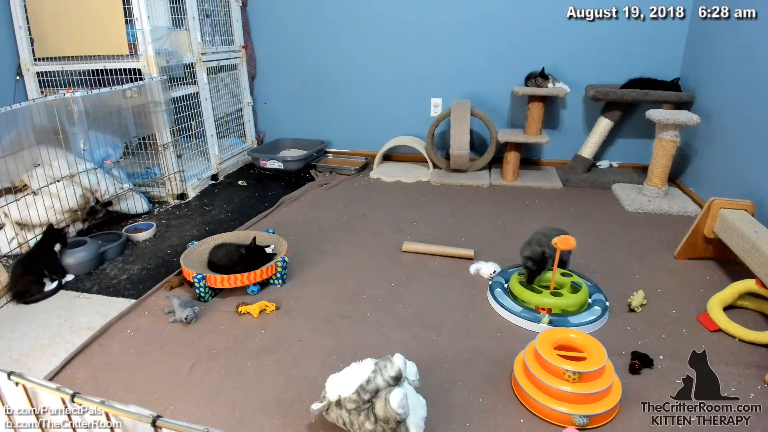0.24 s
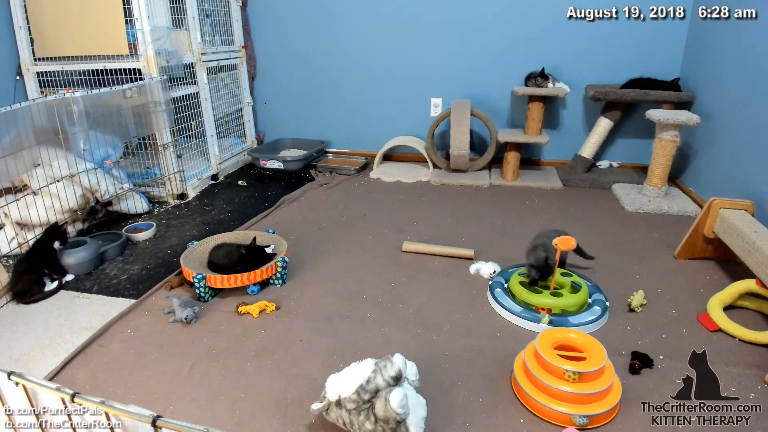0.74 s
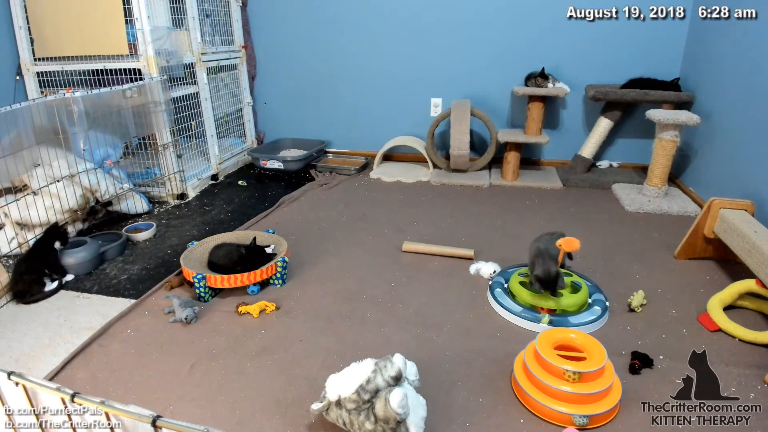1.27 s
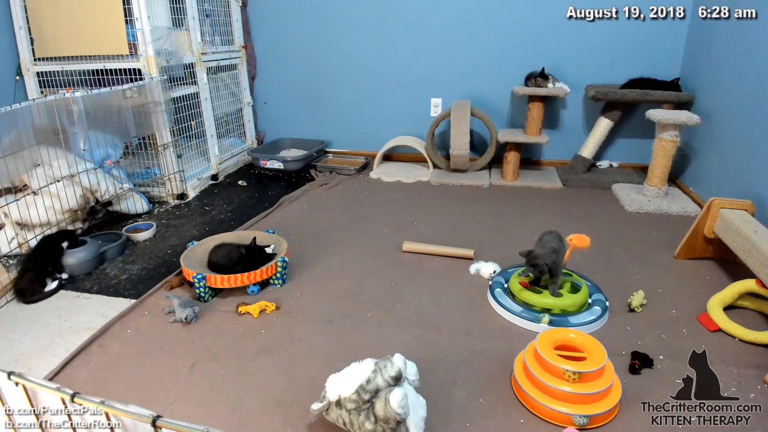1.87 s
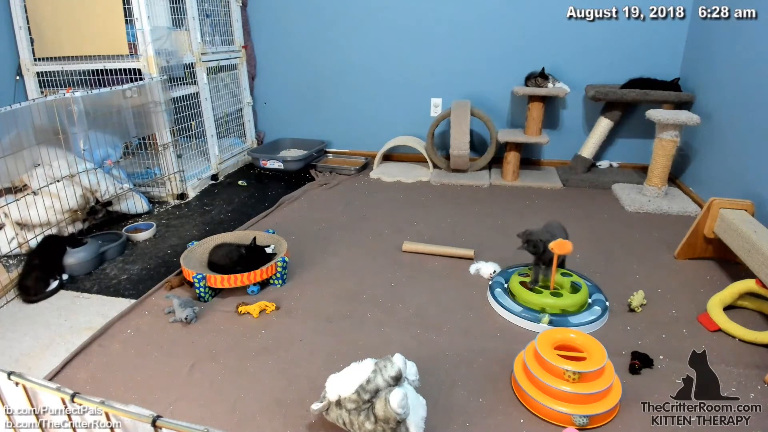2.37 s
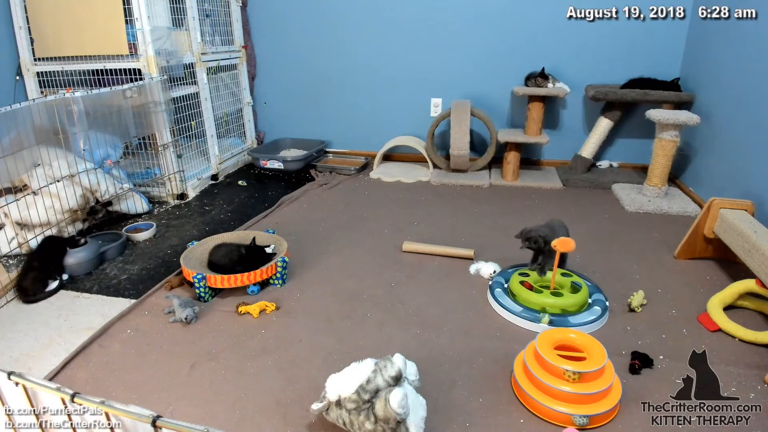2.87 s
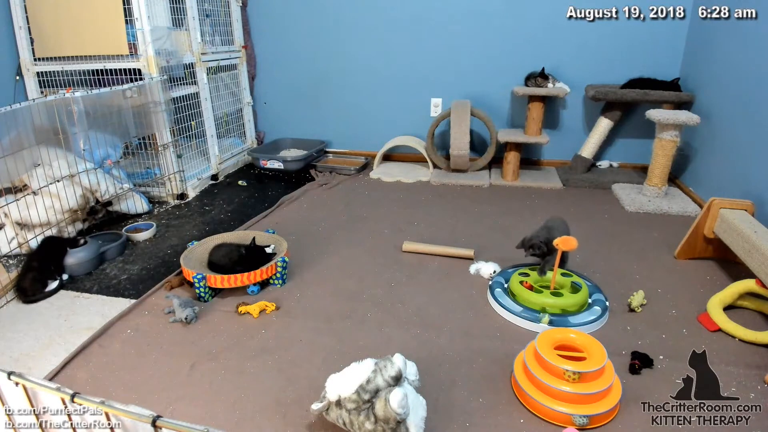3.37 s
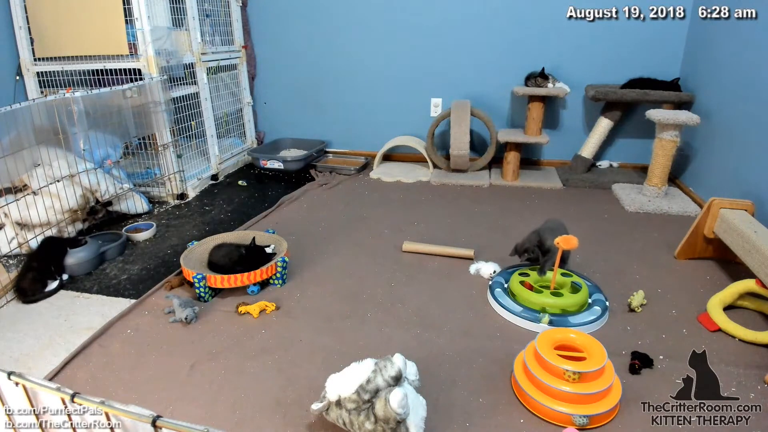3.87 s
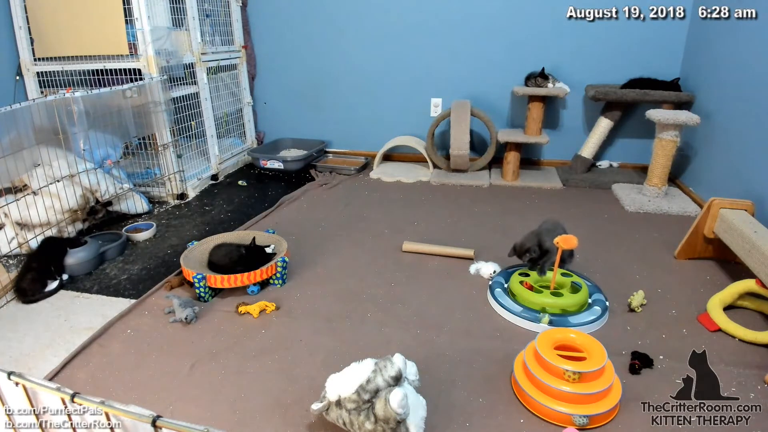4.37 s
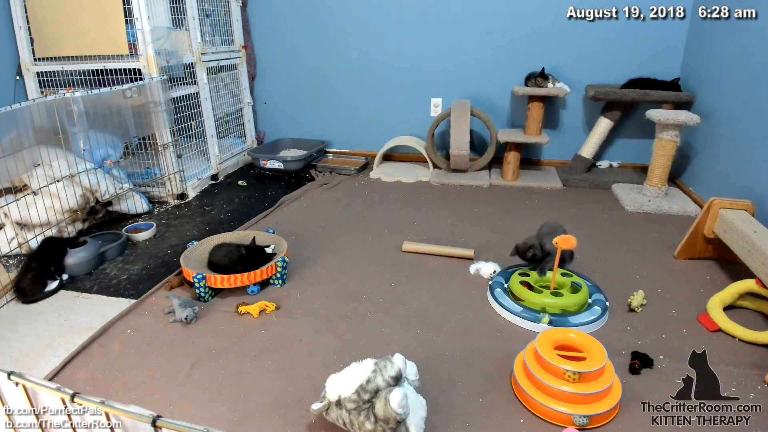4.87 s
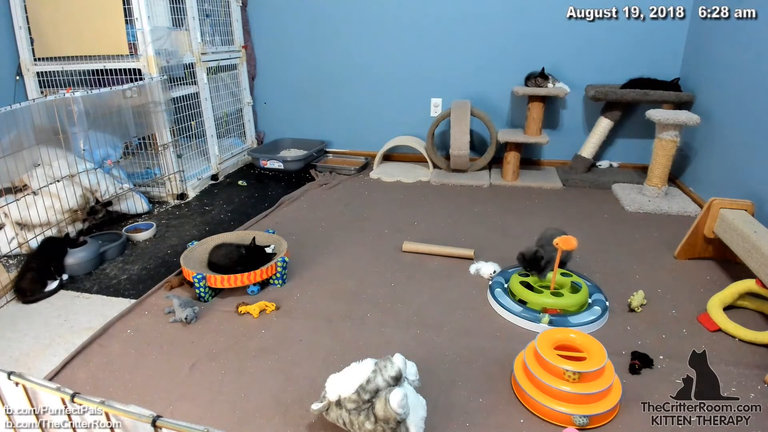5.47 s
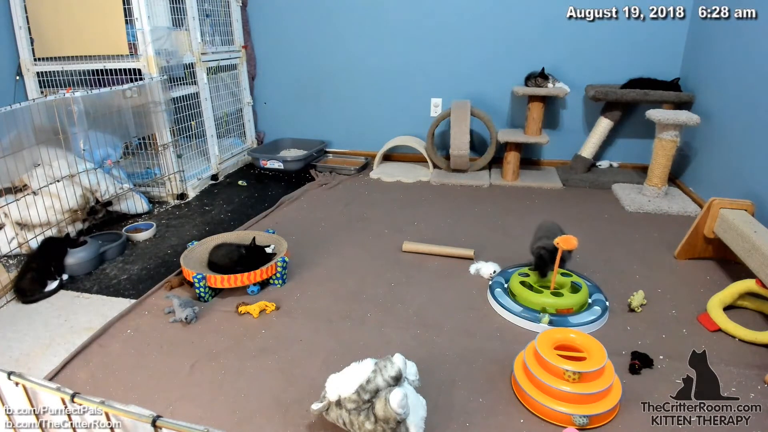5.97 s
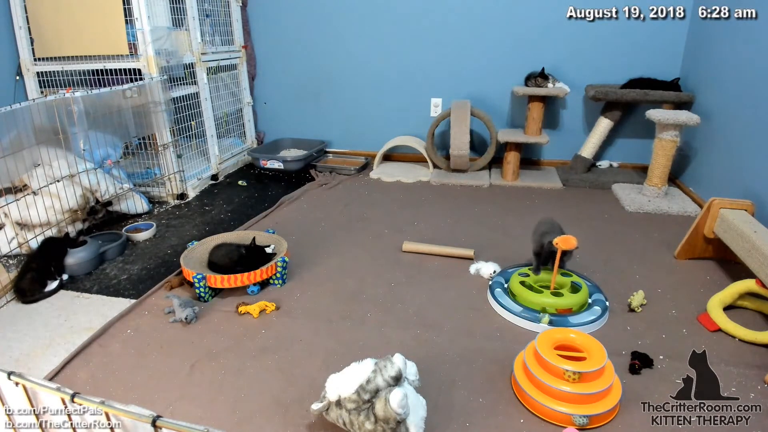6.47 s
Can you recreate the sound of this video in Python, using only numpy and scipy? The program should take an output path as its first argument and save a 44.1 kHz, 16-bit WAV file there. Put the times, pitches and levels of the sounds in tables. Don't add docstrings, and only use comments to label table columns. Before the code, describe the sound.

Hard, dry plastic clatter from a cat's ball track on carpet, heard from a few metres off in a small live room. Faint hiss and low air come first, then a dense flurry of pellet rattles, high clacks and ringing shell pings over hollow track knocks. It fades to single clicks, falls quiet, then resumes with a strong hollow knock, lively rolling rattle and sparser taps at the end.

```python
import sys
import numpy as np
from scipy import signal
from scipy.fft import rfft, irfft
from scipy.io import wavfile
from scipy.ndimage import uniform_filter1d

SR = 44100
rng = np.random.default_rng(int(sys.argv[2]) if len(sys.argv) > 2 else 0)


def output_pcm(signal):
    pcm = np.clip(np.atleast_2d(signal).T, -1, 1) * 32767
    wavfile.write(sys.argv[1], SR, np.round(pcm).astype(np.int16))


def natural_amplitude(level_db):
    exponent = np.asarray(level_db, float) / 20
    return 10 ** exponent


N = 296518

# (frequency [Hz], level [dB], t60 [s])
SHELL_MODES = [(3040, 6, 0.033), (3200, -18, 0.027), (3357, 5.5, 0.014), (3260, -0.5, 0.02),
               (3520, -7.5, 0.014), (3730, -6, 0.031), (3794, 6, 0.016), (4000, -3, 0.014),
               (4190, -6.5, 0.082), (4320, 10, 0.013), (4430, 2, 0.039), (4690, 2.5, 0.019)]
# (frequency [Hz], level [dB], t60 [s])
BELL_MODES = [(7355, 0, 0.017), (6720, -25, 0.026), (8487, -4.5, 0.022), (8560, -3, 0.015),
              (9815, -12, 0.03), (9780, -6.5, 0.025), (12500, -10, 0.0055), (13200, -10.5, .004),
              (13700, -10, .006), (14100, -12, .004), (15000, -13, .006)]
# (frequency [Hz], level [dB], t60 [s])
TRACK_MODES = [(489.4, -5.5, 0.071), (588, -10, 0.072), (671, -3, 0.049), (784.5, 1, 0.047),
               (884, 1.5, 0.031), (982, -9.5, 0.04), (1023, 0, 0.04), (1109, 1.5, 0.051),
               (1256, -7, 0.0346)]
# (frequency [Hz], level [dB], t60 [s])
RIM_MODES = [(1360, 0.5, 0.022), (1530, -2.5, 0.033), (1670, -4, 0.03), (1844, -1, 0.02), (2016, -2, 0.022),
             (2174, -7, 0.041), (2330, -10.5, 0.05)]


def rms_one(x):
    return x / np.sqrt(np.mean(x ** 2) + 1e-20)


def filtered(x, order, hz, kind):
    return signal.sosfilt(signal.butter(order, hz, kind, fs=SR, output="sos"), x)


def ring(clicks, hz, t60_s):
    r = natural_amplitude(-60 / (t60_s * SR))
    w = 2 * np.pi * hz / SR
    return signal.lfilter([0, np.sin(w)], [1, -2 * r * np.cos(w), r * r], clicks + 1e-18)


def train(times_s, db):
    clicks = np.zeros(N)
    clicks[np.round(times_s * SR).astype(int)] = natural_amplitude(db)
    return clicks


def held(times_s, values):
    latest = np.searchsorted(np.round(times_s * SR), np.arange(N), "right") - 1
    return values[np.clip(latest, 0, None)]


def grains(per_s, spread_db):
    sizes = natural_amplitude(spread_db * np.minimum(rng.exponential(1, N), 2.6))
    sizes *= rng.choice([-1, 1], N)
    return rms_one(sizes * (rng.random(N) < per_s / SR))


def bursts(rows, rise_db_per_s, sag_db_per_s, stop_db_per_s):
    hop = 32
    start_s, length_s, db, *rest = np.transpose(rows)
    since = np.arange(0, N, hop) / SR - start_s[:, None]
    rolled = np.clip(since, 0, length_s[:, None])
    levels = db[:, None] - rise_db_per_s * np.maximum(-since, 0)
    levels = levels - sag_db_per_s * rolled - stop_db_per_s * np.maximum(since - rolled, 0)
    lead = levels.argmax(axis=0)
    steps = np.arange(since.shape[1])
    columns = [levels[lead, steps], rolled[lead, steps]] + [c[lead] for c in rest]
    return [np.repeat(c, hop)[:N] for c in columns]


def strike(modes, clicks, favour_hz=None, db_per_octave=0, scatter_db=0, turning_db=0):
    turns_per_s = 3.3
    at = np.flatnonzero(clicks)
    luck = rng.standard_normal((len(at), len(modes)))
    out = np.zeros(N)
    for k, (hz, level_db, t60_s) in enumerate(modes):
        octaves_off = 0 if favour_hz is None else np.abs(np.log2(hz / favour_hz[at]))
        aim = np.sin(2 * np.pi * turns_per_s * at / SR * (1 + k / len(modes)) + k * k)
        push_db = level_db - db_per_octave * octaves_off + scatter_db * luck[:, k] + turning_db * aim
        push = np.zeros(N)
        push[at] = clicks[at] * natural_amplitude(push_db) * (-1) ** k
        out += ring(push, hz, t60_s)
    return out


def crack(clicks, low_hz, high_hz):
    return filtered(clicks, 2, [low_hz, high_hz], "band")


def grit(clicks, tilt_db):
    ribs = [(hz, tilt_db * np.log2(hz / 6000), 62.0 / hz) for hz in np.geomspace(5100, 11300, num=15)]
    return strike(ribs, clicks, scatter_db=6.0) + 0.3 * crack(clicks, 4800, 13000)


def slot(x):
    return filtered(x, 6, 2700.0, "high")


def air():
    air_db, hum_db, hum_hz, hum_t60_s = -57.5, -69, 43.7, 0.16
    # (frequency [Hz], density [dB per Hz])
    spectrum = [(38, -36), (65, -8.5), (92, -10.5), (174, -1), (282, -5.5), (407, -6.5), (588, -11),
                (723, -9), (792, -11.5), (974, -10), (2170, -17.5), (4040, -21.5), (15600, -29)]
    points = np.array(spectrum)
    hz = np.maximum(np.fft.rfftfreq(N, 1 / SR), 1)
    shape = natural_amplitude(np.interp(np.log(hz), np.log(points[:, 0]), points[:, 1]))
    hum = ring(ring(rng.standard_normal(N), hum_hz, hum_t60_s), hum_hz, hum_t60_s)
    hiss = irfft(rfft(rng.standard_normal(N)) * shape, N)
    return natural_amplitude(air_db) * rms_one(hiss) + natural_amplitude(hum_db) * rms_one(hum)


def knocks():
    # (time [s], peak level [dB], favoured track pitch [Hz], thud share [dB])
    blows = [(1.148, -39, 910, -18.5), (1.2, -32.5, 880, -36), (1.562, -25, 760, -22),
             (1.603, -28.5, 736, -12.5), (1.758, -36.5, 1120, -12), (1.837, -36, 1050, -29),
             (1.945, -29, 970, -26), (2.094, -35, 1050, -15.5), (2.224, -58, 1280, -9),
             (2.289, -37, 1203, -32), (2.407, -27.5, 970, -17), (2.65, -43, 1140, -15),
             (2.702, -31.5, 1250, -10.5), (2.829, -40.5, 1150, -9), (3.062, -18.5, 1070, -28),
             (4.204, -37, 1080, -15), (4.413, -30, 1350, -23), (4.448, -8, 980, -20),
             (4.554, -21.5, 1150, -28), (4.719, -23, 1290, -33), (4.921, -28, 755, -44),
             (4.995, -28, 756, -40), (5.125, -31, 700, -33), (5.247, -35, 870, -24),
             (5.498, -33, 1120, -38), (5.782, -48, 1080, -23), (5.98, -36, 804, -6),
             (5.994, -21, 960, -8.5), (6.481, -44, 1110, -31), (6.691, -45.5, 840, -37)]
    # (time [s], level [dB], frequency [Hz])
    stray_taps = [
        (0.017, -48, 7100),
        (3, -32.5, 2540),
        (2.567, -37, 2080),
        (2.581, -38, 2160),
        (4.805, -28, 6440),
        (1.798, -26.5, 2200),
        (4.448, -20.5, 2230),
    ]
    s, db, hz, thud_db = np.transpose(blows)
    body = strike(TRACK_MODES, train(s, db - 7.0), held(s, hz), db_per_octave=18.5, scatter_db=4.0)
    rim = strike(RIM_MODES, train(s, db - 21.5), scatter_db=6.5)
    thud = crack(train(s, db + thud_db + 36.5), 390, 620)
    taps = sum(ring(train(np.array([t]), tap_db), tap_hz, 0.019) for t, tap_db, tap_hz in stray_taps)
    return crack(body, 590, 3700) + rim + thud + taps


def chatter():
    # (start [s], length [s], level [dB], favoured shell pitch [Hz], brightness [dB])
    tumbles = [(1.125, .07, -47, 3520, -3), (1.192, 0.13, -24.5, 3780, 0.5),
               (1.31, 0.074, -20.5, 3570, 5.5), (1.44, 0.052, -17.5, 3200, -1),
               (1.54, 0.17, -26, 3640, 3), (1.787, 0.0096, -16.5, 3500, 3.5),
               (1.842, 0.013, -28.5, 4000, 8), (1.9, 0.13, -24.5, 3880, -6),
               (2.075, 0.017, -32, 3360, 9), (2.1, 0.13, -36.5, 3520, 3.5),
               (2.222, 0.048, -29.5, 3620, -2), (2.31, 0.095, -34, 3740, 5.5),
               (2.52, 0.12, -46.5, 3750, -10), (2.63, .03, -37.5, 3870, -11.5),
               (2.665, 0.014, -32.5, 4000, -9), (2.706, 0.026, -26.5, 4030, -6),
               (2.81, 0.049, -35.5, 4000, -1), (3.065, 0.016, -39, 3760, -1),
               (3.012, 0.0048, -29, 3800, 3), (3.258, 0.0099, -50, 4010, 6),
               (4.139, 0.026, -46.5, 4150, 8), (4.206, 0.015, -48, 3240, -8),
                      (4.383, .035, -32, 3960, -8.5), (4.43, 0.1, -21.5, 3430, 0),
                      (4.708, 0.046, -25.5, 3480, -4), (4.818, .015, -30, 3060, 5.5),
                      (4.849, 0.021, -20, 3320, 3), (4.958, 0.011, -24, 4400, 4),
                      (4.981, 0.084, -23, 3250, 4), (5.105, 0.23, -32, 3630, 2.5),
                      (5.238, 0.14, -27, 3630, 1), (5.499, 0.066, -32.5, 3280, -6.5),
                      (5.546, 0.097, -29.5, 3660, 0), (5.798, 0.01, -41, 3660, 2),
                      (5.914, 0.015, -37, 3730, 1.5), (6.246, 0.028, -32.5, 3300, -5),
                      (6.59, 0.025, -41.5, 3380, -22), (5.982, .025, -28.5, 3300, -0.5),
                      (6.01, 0.0096, -27, 3700, -0.5), (6.144, 0.032, -25, 3700, -4),
                      (6.468, 0.016, -33.5, 3400, -27), (6.67, 0.045, -39, 4000, -24)]
    shell_db, bell_db, grit_db = -5.5, -11.5, -17.5
    pitch_sag_hz_per_s = 1400
    level_db, rolled, start_hz, bright_db = bursts(
        tumbles, rise_db_per_s=2496, sag_db_per_s=11.5, stop_db_per_s=189.5)
    favour_hz = start_hz - pitch_sag_hz_per_s * rolled
    contacts = grains(per_s=460.0, spread_db=1.0) * natural_amplitude(level_db)
    shell = strike(SHELL_MODES, contacts * natural_amplitude(shell_db - 28.5), favour_hz,
                   db_per_octave=19.5, scatter_db=4.5, turning_db=2.5)
    bell = strike(BELL_MODES, contacts * natural_amplitude(bright_db + bell_db - 39.0), scatter_db=8.5, turning_db=3.5)
    ribs = grit(contacts * natural_amplitude(bright_db + grit_db - 30.5), tilt_db=-4.5)
    return slot(shell + bell + ribs)


def pellet_hits():
    # (time [s], peak level [dB], favoured shell pitch [Hz], brightness [dB])
    hits = [(1.133, -44, 3450, -2), (1.1906, -17, 3430, -22), (1.239, -11.5, 3360, 15.5),
            (1.292, -15, 3040, 15), (1.3155, -9.5, 3270, 22), (1.376, -2, 4000, 10),
            (1.536, -21, 3030, -12), (1.6089, -22, 3030, -4), (1.636, -8.5, 3800, 12),
            (1.7689, -8, 3500, 1), (1.7893, -14, 3350, 4), (1.8383, 1.0, 3900, 7),
            (1.9, -5, 3840, 15), (1.9631, -5.5, 3400, 3), (2.0746, -6, 4320, -1.5),
            (2.1068, -1, 3600, 3), (2.193, -9, 4000, 5), (2.2223, -7, 3120, 7.5),
            (2.2446, -7, 3800, 6.5), (2.323, -8, 3030, 6.5), (2.4125, -15, 3700, 3.5),
            (1.8035, 0.5, 3400, 3.5), (2.7066, -10, 4170, 8), (2.714, -3, 3930, 1.5),
            (2.8306, -9.5, 4040, -18), (3.008, -14, 4100, 10.5), (3.018, -8.5, 4250, 4),
            (3.0747, -14.5, 3820, 11), (3.2605, -17, 3990, -5), (3.349, -26.5, 3860, -9.5),
            (4.143, -30.5, 4190, 19), (4.2222, -24, 4040, -12), (4.3934, -17, 3960, -10),
                   (4.4369, -19, 3780, -6), (4.4501, -6, 3370, 13), (4.495, -9.5, 3900, -12),
                   (4.6047, -5, 3500, 0), (4.683, -12, 4370, 7), (4.722, -6.5, 3040, -1),
                   (4.848, -6.5, 3150, 9), (4.9468, -5.5, 4320, 14), (4.9594, -5, 4300, 16.5),
                   (5.0573, -9, 3040, 2), (5.2088, -10.5, 3430, -14), (5.262, -4.5, 3300, 9.5),
                   (5.366, -19, 3360, 5), (5.57, -15, 3050, 1), (5.5892, -15, 4550, -5),
                   (5.622, -11, 3800, -10), (5.8, -13, 3360, -6), (5.9197, -10, 3450, -5),
                   (5.976, -16.5, 4670, -5), (6.024, -9, 3870, 0), (6.139, -10.5, 4150, 6),
                   (6.2515, -24, 3040, 2), (6.182, -20, 4000, 0), (6.477, -17, 4000, -6),
                   (6.529, -23, 3040, -28), (6.6062, -24, 3820, -13), (6.666, -30, 4430, 6)]
    bell_db, grit_db = -22.5, -31
    s, db, hz, bright_db = np.transpose(sorted(hits))
    shell = strike(SHELL_MODES, train(s, db - 19.0), held(s, hz), db_per_octave=38.5, scatter_db=1.5)
    clack = train(s, 1.9 * db + 16.5)
    clack = crack(crack(clack, 2970, 4770), 2100, 4500)
    bell = strike(BELL_MODES, train(s, db + bright_db + bell_db - 15.0), scatter_db=7.0)
    ribs = grit(train(s, db + bright_db + grit_db - 10.5), tilt_db=-1.0)
    return slot(shell + clack + bell + ribs)


def pings():
    # (time [s], peak level [dB], frequency [Hz])
    low_pings = [(1.2919, -12, 2994), (1.3665, -23, 3070), (1.4378, -19, 3160), (1.4844, -19.5, 3100),
                 (1.535, -13.5, 3010), (1.607, -17.5, 3060), (1.581, -24, 2980), (1.6517, -18, 2960),
                 (1.687, -26.5, 2937), (1.76, -29, 2920), (1.786, -11, 3140), (1.9104, -27, 3060),
                 (2.0828, -22, 3115), (2.224, -26, 2940), (2.3085, -24.5, 2970), (2.62, -37, 3030),
                 (2.66, -35, 2960), (2.673, -32, 3060), (4.4775, -22, 2970), (4.498, -30, 3110),
                 (4.521, -30, 3100), (4.5403, -15.5, 3050), (4.7167, -30, 3040), (4.8519, -16.5, 3040),
                 (4.8726, -16.5, 3000), (4.9496, -13, 3100), (4.9755, -14, 3040), (4.9996, -14, 3040),
                 (5.0332, -20, 3054), (5.058, -8.5, 3056), (5.31, -22.5, 2990), (5.5042, -33, 3095),
                 (5.5127, -27.5, 3170), (5.6227, -24, 3055), (5.64, -26.5, 2970), (6.307, -27.5, 3045),
                 (6.023, -24.5, 2895), (6.2488, -20, 3040), (6.5296, -30.5, 3040)]
    # (time [s], peak level [dB], frequency [Hz])
    second_pings = [(1.1967, -22, 3360), (1.2386, -13, 3405), (1.251, -19, 3350), (1.317, -14, 3270),
                    (1.3539, -16, 3400), (1.3713, -15, 3350), (1.389, -20.5, 3200), (1.4056, -20.5, 3470),
                    (1.4506, -15.5, 3230), (1.7584, -24.5, 3340), (1.7889, -8.5, 3340),
                    (1.8383, -22.5, 3330), (1.8986, -37, 3300), (1.944, -20, 3250), (1.9645, -13.5, 3295),
                    (1.9879, -19.5, 3310), (2.0857, -20, 3410), (2.1062, -13, 3520), (2.1251, -21, 3420),
                    (2.2244, -25, 3520), (2.2364, -17, 3450), (4.4374, -24, 3330), (4.4508, -25, 3310),
                    (4.4708, -17, 3520), (4.5042, -20, 3370), (4.6025, -30, 3280), (4.8514, -16, 3300),
                    (4.9487, -22, 3200), (5.0465, -30, 3320), (5.1931, -21.5, 3350), (5.262, -22, 3310),
                    (5.2829, -16.5, 3300), (5.5423, -24, 3180), (5.556, -25, 3200), (5.5892, -19.5, 3024),
                    (6.1525, -23, 3460)]
    # (time [s], peak level [dB], frequency [Hz])
    third_pings = [(1.2376, -24.5, 3720), (1.343, -20, 3730), (1.3718, -19, 3800), (1.4487, -26, 3960),
                   (1.4691, -22.5, 3700), (1.4986, -13, 3880), (1.6013, -25.5, 3980), (1.7694, -18, 3770),
                   (1.7894, -9, 3730), (1.8385, -3, 3760), (1.8991, -16.5, 3800), (2.1064, -29.5, 3860),
                   (2.1276, -19, 3600), (2.2238, -26, 3820), (2.2478, -18, 3850), (2.3257, -31, 3840),
                   (2.6634, -26.5, 3920), (2.7046, -18, 3890), (2.9957, -32, 4070), (3.0071, -23, 3700),
                   (3.075, -19, 3850), (3.258, -24.5, 4025), (4.4377, -14.5, 3790), (4.47, -21, 3810),
                   (4.496, -16, 3840), (4.611, -28, 4050), (4.723, -22, 3800), (4.833, -21, 4020),
                   (4.8494, -25, 4100), (4.9462, -27, 4120), (4.9592, -23, 4050), (5.262, -23, 3940),
                   (5.281, -23, 3900), (5.395, -27, 3750), (5.604, -30, 3800), (6.0099, -20, 4020),
                   (6.0208, -18, 4000), (6.138, -21, 3840), (6.151, -14, 3820), (6.3559, -33, 3890)]
    # (time [s], peak level [dB], frequency [Hz])
    top_pings = [(1.206, -23, 4380), (1.2465, -18, 4340), (1.278, -16, 4430), (1.4486, -23.5, 4190),
                 (1.4793, -16, 4430), (1.6067, -23, 4380), (1.7886, -21.5, 4570), (1.8033, -12.5, 4090),
                 (1.8263, -18.5, 4240), (1.838, -5.5, 4350), (1.899, -21, 4220), (1.938, -20, 4380),
                 (2.106, -14, 4340), (1.645, -23, 4350), (1.68, -19.5, 4390), (2.2448, -27, 4370),
                 (2.3247, -23.5, 4340), (2.705, -12, 4170), (2.7183, -12, 4310), (3.0056, -24, 4020),
                 (3.0098, -16.5, 4580), (3.258, -31.5, 4190), (4.4698, -17.5, 4620), (4.61, -22, 4450),
                 (4.7192, -24, 4800), (4.7388, -16.5, 4190), (4.835, -33, 4190), (4.849, -15, 4180),
                 (4.8758, -16, 4430), (4.946, -11, 4295), (5.031, -19, 4290), (5.046, -14, 4240),
                 (5.263, -17, 4250), (5.538, -31, 4530), (5.5697, -27, 4570), (5.587, -29, 4570),
                 (5.9185, -26, 4320), (6.0113, -30, 4120), (6.03, -16, 4150), (6.1372, -19, 4110),
                 (6.4843, -30, 4410)]
    # (time [s], peak level [dB], frequency [Hz])
    follow_pings = [(1.199, -32.5, 865), (1.245, -27, 880), (1.463, -10, 3350), (1.229, -29, 1360),
                    (1.305, -27, 2206), (1.42, -32.5, 1696), (1.455, -40, 340), (1.499, -34, 341),
                    (1.505, -27, 1670), (1.558, -25, 1712), (2.552, -39, 3610), (2.57, -41, 3610),
                    (4.555, -25, 3082), (4.748, -26, 4060), (5.009, -15.5, 3037), (4.715, -35, 1111),
                    (4.868, -28, 2220), (4.875, -34, 775), (4.917, -32, 767), (4.992, -25, 783),
                    (5.125, -29, 868), (5.272, -31, 847), (5.37, -32, 1075), (5.995, -26, 940),
                    (6.021, -29, 900), (6.018, -31.5, 1037), (6.005, -23.5, 3050), (6.234, -24, 3040),
                    (6.18, -23.5, 3850), (4.449, -17, 1109), (4.449, -18.5, 872), (6.27, -29, 4400),
                    (6.3, -30, 3850), (6.591, -38, 3770), (6.6685, -34, 4430)]
    # (level [dB], t60 [s])
    ping_modes = [(-1, 0.062), (-1, .04), (-2, 0.039), (-1.5, 0.032), (-3, 0.094)]
    rise_s = 0.00058
    t = np.arange(SR // 8) / SR
    out = np.zeros(N + SR)
    groups = (low_pings, second_pings, third_pings, top_pings, follow_pings)
    for rows, (mode_db, t60_s) in zip(groups, ping_modes):
        shape = (1 - np.exp(-t / rise_s)) * natural_amplitude(-60 * t / t60_s)
        for s, db, hz in rows:
            out[int(s * SR):][:len(t)] += natural_amplitude(db + mode_db) * shape * np.sin(2 * np.pi * hz * t)
    return out[:N]


def rumble():
    # (start [s], length [s], body level [dB], rim share [dB], base share [dB])
    runs = [(1.225, .1, -44.5, 8.5, -15), (1.31, 0.21, -40.5, 2, -1.5), (1.55, 0.095, -49, 5.5, -1.5),
            (1.79, 0.49, -54.5, 6, 1.5), (2.23, 0.16, -56, 8, -8), (2.68, 0.13, -62.5, 7, 4),
            (3.065, 0.012, -44, -11, -17.5), (4.15, 0.092, -73, -1, 10.5), (4.452, 0.048, -36.5, -2.5, -19),
            (4.8, 0.4, -43, 5.5, -20), (5.24, 0.32, -48, 1.5, -19), (6.0, 0.0046, -44.5, 3, -32),
            (6.17, 0.053, -69.5, 21.5, -15), (6.47, 0.09, -69, -21, -6)]
    # (frequency [Hz], level [dB], t60 [s])
    base_modes = [(206, -3.5, 0.06), (260, -8.5, 0.021), (336, 0, 0.11), (420, -7, 0.06)]
    start_hz, sag_hz_per_s, lowest_hz = 1050, 4300, 814
    body_db, rolled, rim_db, base_db = bursts(runs, rise_db_per_s=697, sag_db_per_s=26.5, stop_db_per_s=156)
    favour_hz = np.maximum(start_hz - sag_hz_per_s * rolled, lowest_hz)
    contacts = grains(per_s=900.0, spread_db=8.0) * natural_amplitude(body_db)
    body = strike(TRACK_MODES, contacts * natural_amplitude(-26.5), favour_hz, db_per_octave=7.0, scatter_db=4.5)
    rim = strike(RIM_MODES, contacts * natural_amplitude(rim_db - 28.5), scatter_db=5.5)
    base = strike(base_modes, contacts * natural_amplitude(base_db - 29.0), scatter_db=-3.5)
    return body + rim + base


def room(x):
    t60_s, wet_db, wall_cut_hz = 0.22, 0.5, 16000
    places, step_s = 5, 0.08
    t = np.arange(int(0.5 * SR)) / SR
    decay = natural_amplitude(-60 * t / t60_s)
    white = rng.standard_normal((places, len(t))) * np.clip(t / 0.0038 - 0.5, 0, 1) * decay
    dull = filtered(white, 1, wall_cut_hz, "low")
    tails = dull + (white - dull) * decay
    tails /= np.sqrt(np.sum(tails ** 2, axis=1, keepdims=True))
    along = (np.arange(N) / SR / step_s - np.arange(places)[:, None]) % places
    share = np.where(along < 2, np.sin(np.pi * along / 2), 0)
    wet = signal.fftconvolve(x * share, tails, axes=1)[:, :N].sum(axis=0)
    return x + natural_amplitude(wet_db) * wet


def scene():
    ping_room_share = 0.52
    toy = chatter() + rumble() + pellet_hits() + knocks()
    toy = filtered(toy, 4, 150.0, "high")
    soft_pings = pings()
    return (room(toy + ping_room_share * soft_pings) + (1 - ping_room_share) * soft_pings + air())[None]


def masking(x):
    top_hz, top_db, low_hz, low_db = 9800, -38, 110, -45
    hz, _, cells = signal.stft(x, SR, nperseg=2048, noverlap=1536)
    power = np.abs(cells) ** 2
    top = uniform_filter1d(power, size=5, axis=0) * 25
    top_weak = top < power[hz > 2000].sum(axis=0) * natural_amplitude(2 * top_db)
    top_weak = top_weak & (hz > top_hz)[:, None]
    low = hz < low_hz
    low_weak = power[low].sum(axis=0) < power.sum(axis=0) * natural_amplitude(2 * low_db)
    low_weak = low_weak & low[:, None]
    kept = ~(top_weak | low_weak) & (hz < 15750)[:, None]
    return signal.istft(cells * kept, SR, nperseg=2048, noverlap=1536)[1][:N]


def roll_off(x):
    return signal.sosfilt(signal.butter(12, 15790, fs=SR, output="sos"), x)


def record(dry):
    mix = masking(dry[0])[None]
    return roll_off(mix)


dry = scene()
out = record(dry)
output_pcm(out)
```